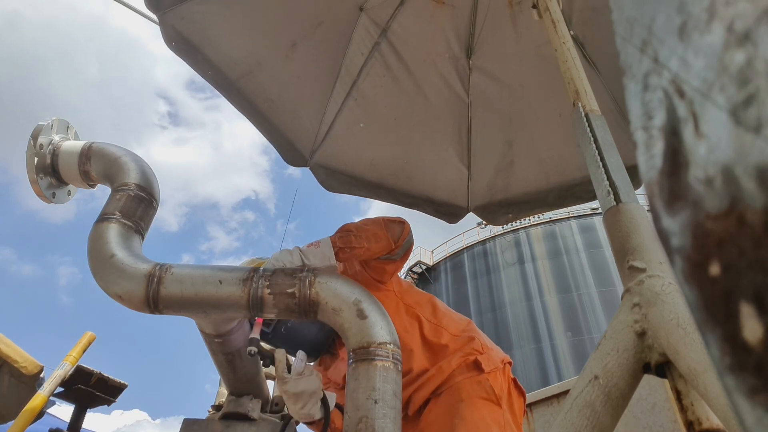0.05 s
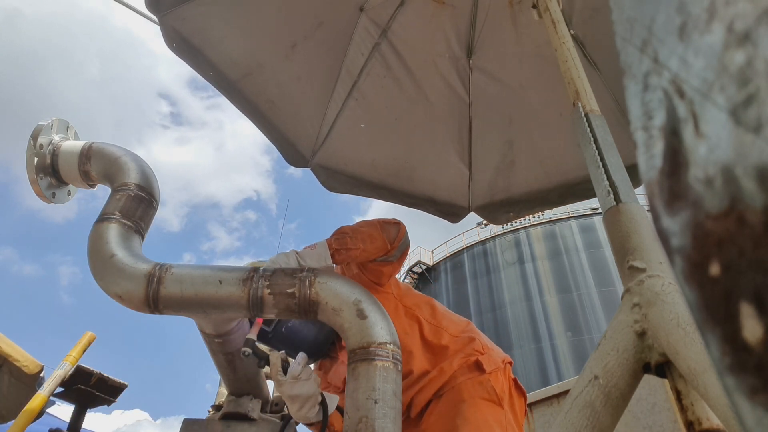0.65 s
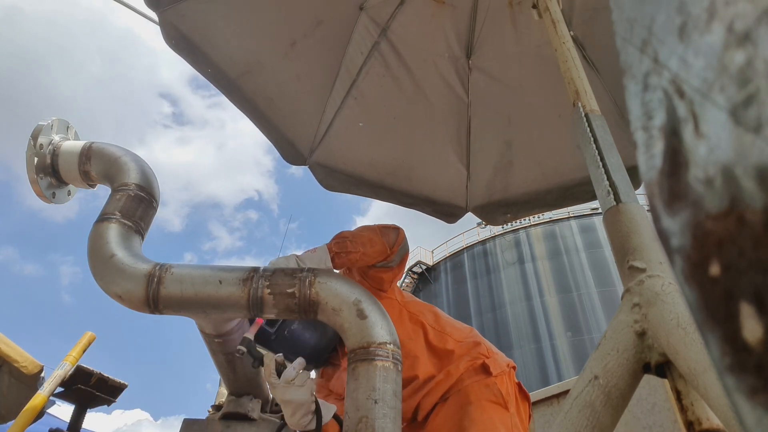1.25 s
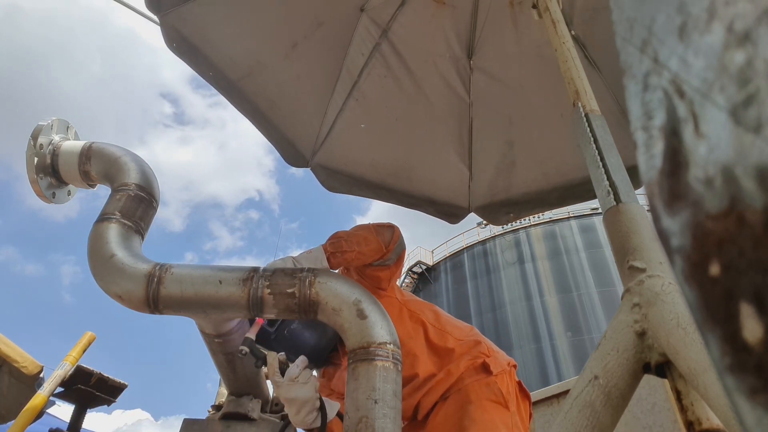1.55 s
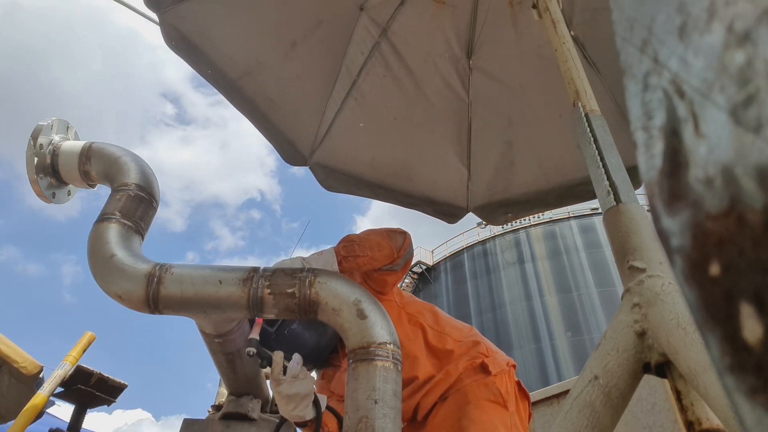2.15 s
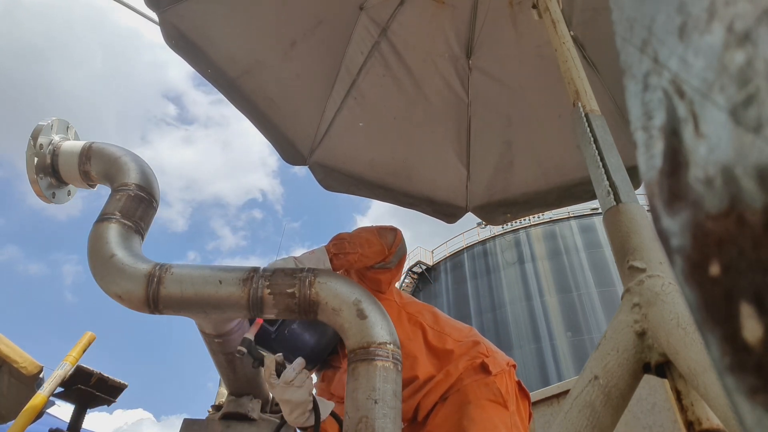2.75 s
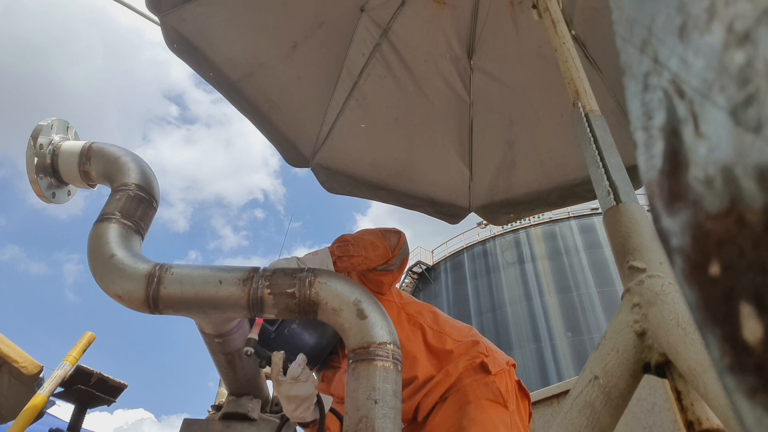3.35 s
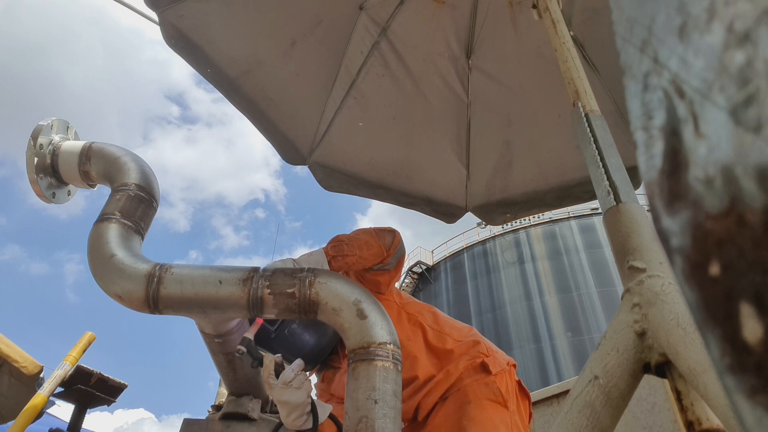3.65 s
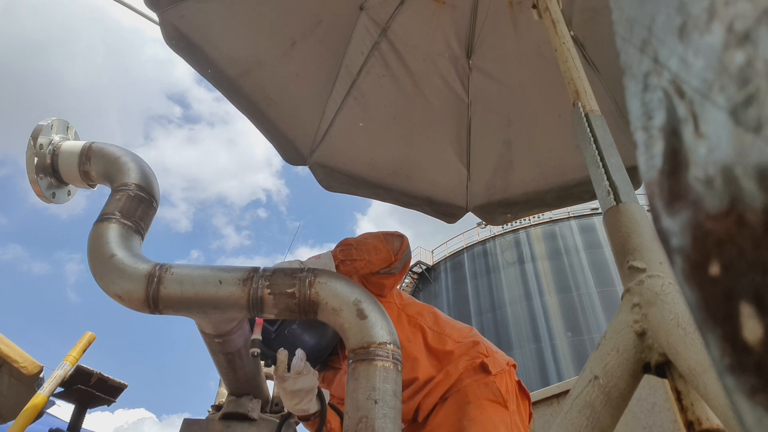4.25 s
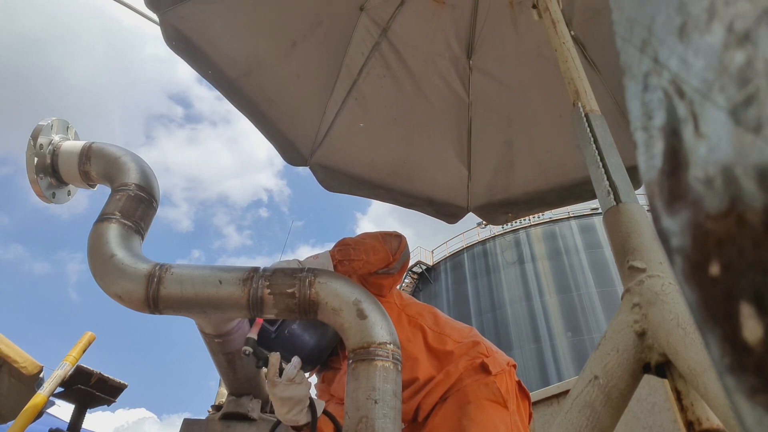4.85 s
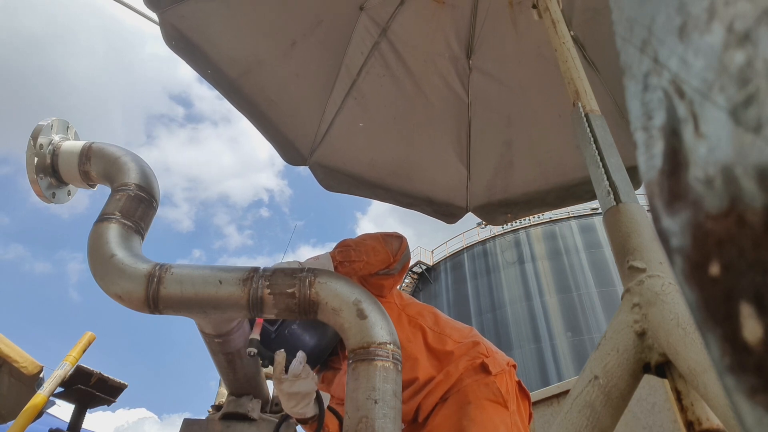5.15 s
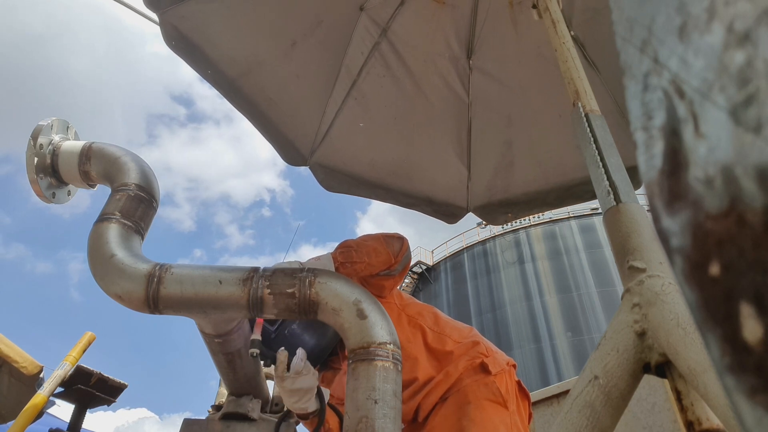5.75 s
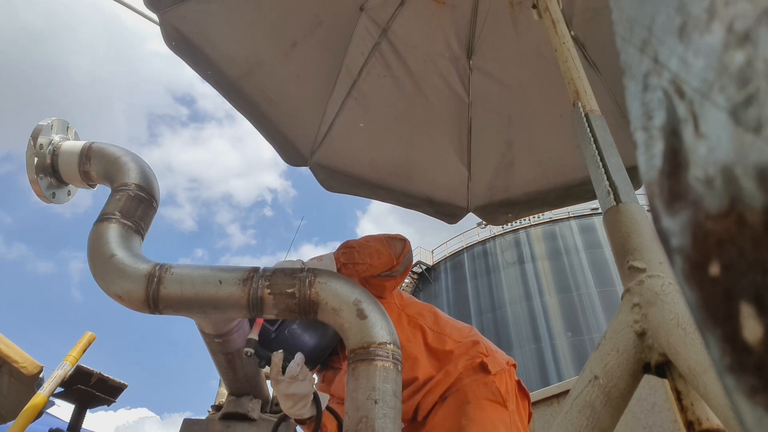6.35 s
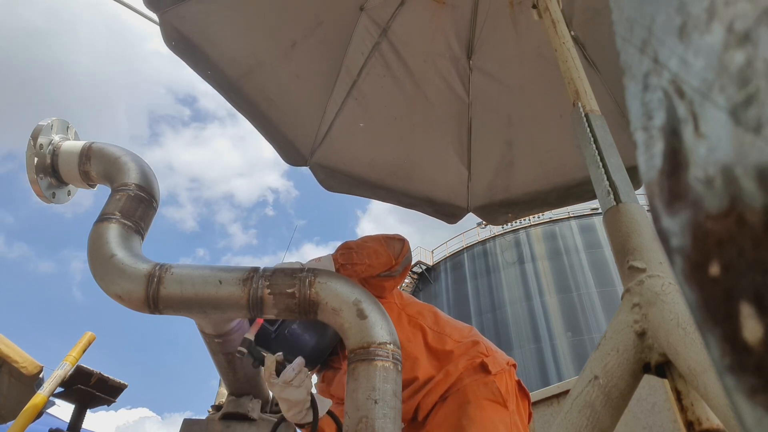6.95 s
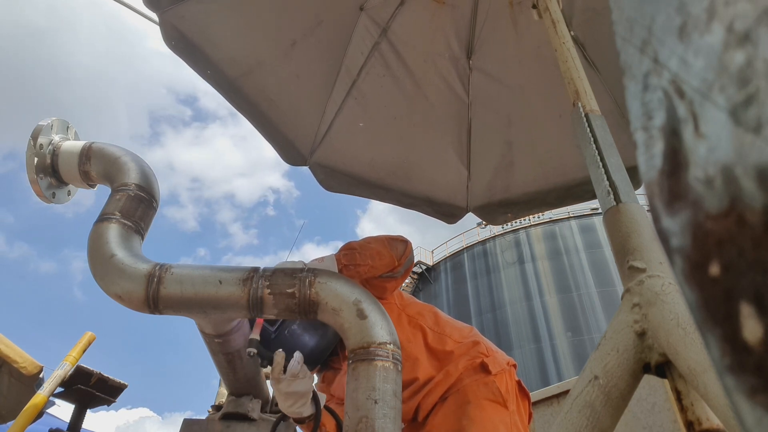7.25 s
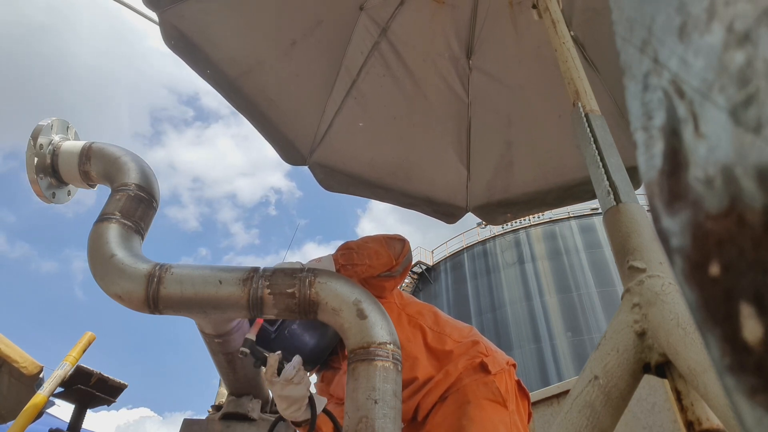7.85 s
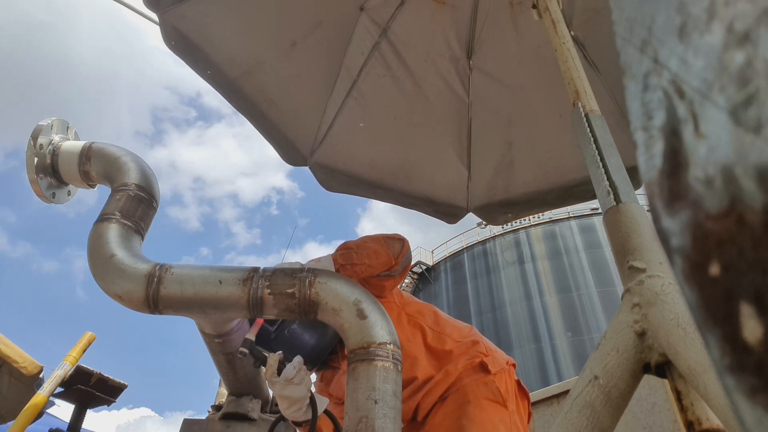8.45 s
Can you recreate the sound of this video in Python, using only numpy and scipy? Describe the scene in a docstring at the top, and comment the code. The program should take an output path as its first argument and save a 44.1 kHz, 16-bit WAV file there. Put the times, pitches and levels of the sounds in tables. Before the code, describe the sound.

An engine-driven welding generator hums steadily with a pulsing whine, while a welding arc hisses faintly on a steel pipe.

```python
"""An engine-driven welding generator hums outdoors while a pipe joint is TIG welded beside it.
The engine's firing makes the hum, which surges slightly two or three times a second. Its shaft
turns a droning fan and an alternator whose whine swells with each surge. Near 2 s the hum changes
tone and a faint rushing noise stops. The arc and its shielding gas hiss among the steel pipes,
whistling briefly at the start, and the arc spits once. A faint, even flutter lies over the hiss."""
import sys
import numpy as np
from scipy import signal
from scipy.fft import rfft, irfft, next_fast_len
from scipy.io import wavfile

SR = 44100
rng = np.random.default_rng(int(sys.argv[2]) if len(sys.argv) > 2 else 0)


def unload_wav(signal):
    """Save mono or channel-first audio to the path in sys.argv[1] as 16-bit WAV at rate SR, clipped to [-1, 1]."""
    wavfile.write(
        sys.argv[1],
        SR,
        np.round(np.clip(np.atleast_2d(signal).T, -1, 1) * 32767).astype(np.int16),
    )


N = 374409
TIME = np.arange(N) / SR
FFT_SIZE = next_fast_len(N, True)
FREQUENCIES = np.fft.rfftfreq(FFT_SIZE, 1 / SR)

# steady tones of the engine (multiple of the firing rate, level [dB])
STEADY_TONES = [(1, -25), (2, -39.5), (4, -55.5), (6, -68.5), (8, -74), (16, -73)]
# engine tones that change once (multiple of the firing rate, level before [dB], level after [dB],
# boost during the change [dB], growth afterwards [dB/s])
CHANGING_TONES = [(3, -50, -46, 9.5, .65), (5, -52.5, -62.5, 10, 0.5)]
# exhaust rumble (frequency [Hz], level [dB per Hz])
EXHAUST_RUMBLE = [(10, -78), (25, -65.5), (55, -62), (80, -60), (130, -64), (165, -66), (230, -65.5),
                  (300, -65), (355, -60.5), (410, -67), (490, -74.5), (600, -88), (780, -92), (2500, -120)]
# engine surges (start [s], length [s], full rise of the firing rate [Hz], full rise of the whine [dB])
ENGINE_SURGES = [(-0.04, 0.46, 0.83, 6.5), (0.67, 0.14, 2.03, 5.5), (0.96, 0.375, 0.3, 4.5),
                 (1.429, 0.21, 0.98, 2.2), (1.81, 0.34, 0.67, 7.5), (2.22, 0.25, 0.68, 5.2),
                 (2.551, 0.25, 1.1, 7), (2.941, 0.32, 0.79, 7), (3.35, 0.29, 0.8, 6.5),
                 (3.81, 0.27, 0.78, 8), (4.12, 0.13, 2.0, 7.5), (4.379, 0.23, 0.98, 5),
                 (4.809, 0.23, 0.8, 7.5), (5.14, 0.27, 0.3, 5.5), (5.5, 0.284, 1.096, 7.4),
                 (5.91, 0.25, 1.2, 8), (6.3, 0.34, 0.4, 6.5), (6.72, 0.23, 1.52, 7.2),
                 (7.179, 0.25, 1.0, 7), (7.54, 0.17, 0.2, 5.8), (7.9, 0.13, 0.5, 7),
                 (8.14, 0.29, 0.41, 4.5)]
# twisting shudder of the shaft (frequency [Hz], size [dB per Hz, relative to one firing cycle])
SHAFT_SHUDDER = [(3, -72), (8, -51), (12, -53), (20, -57), (40, -64), (60, -67), (88, -70.5), (102, -85),
                 (125, -90), (200, -100), (500, -140)]
# the tone an octave above the whine, between surges (time [s], level [dB])
WHINE_OCTAVE = [(0, -53), (.55, -56), (1.4, -53), (2.6, -51.5), (5.6, -53), (7, -56), (8.49, -64)]
# even hiss of the gas and the surroundings (frequency [Hz], level [dB per Hz])
GAS_HISS = [(100, -77), (620, -85), (780, -88.5), (1250, -87), (1650, -87), (2330, -97), (2650, -84),
            (4300, -86), (5100, -93), (7000, -92.5), (10500, -93), (12500, -96), (15500, -95)]
# pitches at which housing and pipes ring (frequency [Hz], width before narrowing [Hz],
# level [dB per Hz], left louder by [dB], left ahead by [radians])
STEEL_RESONANCES = [(954, 97, -73.8, -3, 1), (1138, 93, -83, 0, 0), (1410, 150, -77, -2.5, 2),
                    (1892, 156, -79, -6.5, 0.67), (2000, 115, -83, 4, 1.1), (2850, 445, -82.5, -6, -1.55),
                    (3338, 223, -73.5, -0.5, -1.1), (3805, 210, -78, 7, -2.13),
                    (4384, 136, -80.5, -6, -1.55), (5600, 200, -89.5, 1, 4.5), (6340, 270, -94, -6, -5),
                    (7130, 47, -82, -2, 1.5), (7790, 190, -89.5, 15, -2.5), (8170, 280, -86.5, 12, 1),
                    (8820, 200, -93.5, 6, .3), (9380, 100, -88, 13.5, 2.5), (9500, 130, -90, 12.5, 2.5),
                    (10000, 160, -92, 3, 1), (10250, 240, -87.5, 12, 2), (11130, 730, -92, 2, 1),
                    (12750, 400, -96, -8, 1), (13900, 800, -101, -12, -6)]
# swelling of the hiss in three bands (time [s], body [dB], sizzle [dB], fizz [dB])
HISS_SWELLS = [(0, 1, 2, -1), (.4, -.5, -1.5, -0.5), (1.2, 0.5, 0.5, -0.5), (1.55, 1, 2.3, 1.7),
               (2.35, 1.5, -1, .3), (2.75, -0.8, -1, -0.5), (3.15, .3, -1.5, 0.7), (4.2, 0.2, -1, 0.2),
               (5.45, 0, 0, 0), (5.7, 0, -0.5, .6), (6.5, 0.5, -.5, 0), (6.8, 1.1, 0, 1), (7.1, 0, 0, 0),
               (8.49, 0.2, 1, .5)]
# where each band is at full strength (body [Hz], sizzle [Hz], fizz [Hz])
BAND_CENTRES = [5200, 8500, 8700]
# spit of the arc (time [s], level at its loudest [dB], swell time [s])
ARC_SPITS = [(1.519, -29.7, 0.0046)]
# how the pipe rings after a spit (frequency [Hz], width [Hz], relative level [dB])
PIPE_RING = [(300, 110, 8), (980, 59, 7), (1970, 170, -6), (3420, 1100, -11), (6000, 2000, -29)]
# brief whistles in the gas hiss (time [s], spread [s], frequency [Hz], width [Hz], level [dB])
GAS_WHISTLES = [(0.1, 0.2, 2820, 110, -53), (0.06, 0.1, 8420, 110, -58)]

FIRING_HZ = 91.56  # firings per second, between surges
CHANGE_S, CHANGE_SPREAD_S = 1.93, 0.049  # when and how quickly the hum changes tone


def engine(cycles):
    """The engine's firings blend into a hum over a broad exhaust rumble."""
    throb_db = 0.16 * waver(4.6)
    hum = sum(tone(multiple * cycles, db + throb_db, pan_db=-0.5, lead=0.14)
              for multiple, db in STEADY_TONES)
    done, during = hum_change()
    for multiple, before_db, after_db, boost_db, growth in CHANGING_TONES:
        later_db = after_db + growth * (TIME - CHANGE_S)
        db = (1 - done) * before_db + done * later_db + during * boost_db
        hum += tone(multiple * cycles, db, pan_db=1, lead=0.14)
    noise = white() * left_right(pan_db=-0.5, lead=0.14) + 0.1 * stereo_white()
    return hum + to_samples(noise * tone_curve(EXHAUST_RUMBLE))


def hum_change():
    """How far the hum's change of tone has got (0 to 1), and a bump while it happens."""
    progress = (TIME - CHANGE_S) / CHANGE_SPREAD_S
    return smooth_step(progress), np.exp(-0.5 * progress ** 2)


def surges(attack_s=0.043, release_s=0.075):
    """Each surge rises quickly, holds and sinks back, lifting the firing rate and the whine's level."""
    rise_hz = rise_db = 0
    for start, length, hz, db in ENGINE_SURGES:
        rising = smooth_step((TIME - start) / attack_s)
        falling = smooth_step((start + length - TIME) / release_s)
        rise_hz += hz * rising * falling
        rise_db += db * rising * falling
    return rise_hz, rise_db


def shaft(rise_hz):
    """Counts firing cycles as the shaft surges slowly and shudders fast."""
    firing_hz = FIRING_HZ + rise_hz + 0.3997 * waver(9)
    shudder = to_samples(white() * tone_curve(SHAFT_SHUDDER))
    cycles = np.cumsum(firing_hz) / SR + shudder
    return cycles + 0.0019 * np.sin(2 * np.pi * cycles)  # each firing gives a small push


def fan(cycles, multiple=4.052):
    """The belt-driven fan drones just above the engine's fourth tone, so the two beat together."""
    _, during = hum_change()
    db = -32 + 0.15 * TIME + 0.62 * waver(6.5)
    dip_db = -21 * during  # the drone dips briefly as the hum changes
    return tone(multiple * cycles, db + dip_db, pan_db=3, lead=0.13)


def alternator(cycles, rise_db, multiple=10):
    """A whine and its octave swell with each surge; the shaft's shudder roughens their pitch."""
    whine_db = -44 + rise_db + 0.8 * waver(7.1)
    whine = tone(multiple * cycles, whine_db, pan_db=-3, lead=0.32)
    octave_db = time_curve(WHINE_OCTAVE) + 0.44 * rise_db + 1.2 * waver(8)
    return whine + tone(2 * multiple * cycles, octave_db, pan_db=-3.5, lead=0.7)


def arc(groups=3):
    """Arc and gas make a flickering hiss among the ringing steel."""
    hiss = to_samples(stereo_white() * tone_curve(GAS_HISS))
    # neighbouring pitches go in different groups, so their levels drift apart
    hiss += sum(ringing_steel(STEEL_RESONANCES[group::groups]) for group in range(groups))
    flicker = gain_of(0.47 * waver(70))
    return torch_motion(hiss) * flicker


def ringing_steel(resonances, narrowing=0.69):
    """Gas noise rings housing and pipes at a group of pitches that drift in level together."""
    spectrum = sum(white() * resonance(hz, narrowing * width) * gain_of(db) * left_right(pan_db, lead)
                   for hz, width, db, pan_db, lead in resonances)
    return to_samples(spectrum) * gain_of(0.69 * waver(5))


def torch_motion(hiss):
    """Moving the torch swells three bands of the hiss, each by its own amount."""
    spectrum = rfft(hiss, FFT_SIZE)
    moved = 0
    for column, weights in enumerate(np.eye(len(BAND_CENTRES)), 1):
        band = np.interp(FREQUENCIES, BAND_CENTRES, weights)  # fades into the bands beside it
        swell_db = time_curve(HISS_SWELLS, column) + 0.45 * waver(3)
        moved += to_samples(spectrum * band) * gain_of(swell_db)
    return moved


def spit():
    """A soft, short sputter of the molten metal rings the pipe."""
    envelope = sum(gain_of(db) / (1 + ((TIME - time) / swell) ** 2) for time, db, swell in ARC_SPITS)
    ring = sum(gain_of(db) * resonance(hz, width) for hz, width, db in PIPE_RING)
    sputter = white() + 0.5 * stereo_white()
    return envelope * normalise(to_samples(sputter * ring))


def whistles():
    """Narrow bands of the gas hiss stand out for a moment."""
    sound = 0
    for time, spread, hz, width, db in GAS_WHISTLES:
        noise = normalise(to_samples(stereo_white() * resonance(hz, width)))
        envelope = np.exp(-0.5 * ((TIME - time) / spread) ** 2)
        sound += noise * gain_of(db) * envelope
    return sound


def rush():
    """A faint rushing noise from the machine flares as the hum changes, then stops."""
    done, during = hum_change()
    noise = normalise(to_samples(white() * resonance(hz=446, width_hz=40)))
    return noise * (1 - done) * gain_of(-51 + 10 * during)


def flutter(hiss, flutter_hz=172.27):
    """A faint, even flutter is laid over the hiss."""
    angle = 2 * np.pi * flutter_hz * TIME
    return hiss * (1 + 0.11 * np.cos(angle) + 0.03 * np.cos(2 * angle))


def tone(cycles, db, pan_db, lead):
    """A pure stereo tone that starts at a random point in its cycle."""
    angle = 2 * np.pi * (cycles + rng.random())
    sides = left_right(pan_db, lead)
    return np.sqrt(2) * gain_of(db) * np.real(sides * np.exp(1j * angle))


def left_right(pan_db, lead):
    """Two gains that make the left side louder by pan_db and ahead by lead radians."""
    side = np.array([[0.5], [-0.5]])
    return gain_of(side * pan_db) * np.exp(1j * side * lead)


def resonance(hz, width_hz):
    """A bell-shaped gain that falls to half at width_hz either side of its peak."""
    return 1 / (1 + ((FREQUENCIES - hz) / width_hz) ** 2)


def tone_curve(points):
    """Gain at every frequency, from (frequency [Hz], level [dB]) points."""
    hz, db = np.transpose(points)
    return gain_of(np.interp(np.log(FREQUENCIES + 1), np.log(hz + 1), db))


def time_curve(rows, column=1):
    """Joins one column of timed rows with straight lines."""
    columns = np.transpose(rows)
    return np.interp(TIME, columns[0], columns[column])


def waver(rate_hz):
    """Random wobble of typical size 1, up to about the given rate."""
    times = np.arange(0, TIME[-1] + 1, 0.5 / rate_hz)
    return normalise(np.interp(TIME, times, rng.standard_normal(len(times))))


def white():
    """Spectrum of fresh white noise at 0 dB per Hz."""
    spectrum = rng.standard_normal(len(FREQUENCIES)) + 1j * rng.standard_normal(len(FREQUENCIES))
    return spectrum * np.sqrt(FFT_SIZE * SR) / 2


def stereo_white():
    """Separate white noise spectra for left and right."""
    return np.array([white(), white()])


def to_samples(spectrum):
    """Turns a spectrum into a sound wave."""
    return irfft(spectrum, FFT_SIZE)[..., :N]


def smooth_step(x):
    """Glides from 0 to 1 as x passes zero."""
    return 0.5 + 0.5 * np.tanh(x)


def gain_of(db):
    """Turns decibels into a multiplier."""
    return 10 ** (np.asarray(db) / 20)


def normalise(x):
    """Scales a signal to a typical size (rms) of 1."""
    return x / np.sqrt(np.mean(abs(x) ** 2) + 1e-30)


def scene():
    """One shaft drives engine, fan and alternator; the arc's hiss swells slightly with each surge."""
    rise_hz, rise_db = surges()
    cycles = shaft(rise_hz)
    hiss = arc() * gain_of(0.026 * (rise_db - rise_db.mean()))
    generator = engine(cycles) + fan(cycles) + alternator(cycles, rise_db)
    return generator + flutter(hiss) + spit() + whistles() + rush()


def record(dry):
    """Cuts away the very highest treble."""
    cutoff_hz = 15480
    lowpass = signal.firwin(1023, cutoff_hz, window=("kaiser", 9), fs=SR)
    return signal.oaconvolve(dry, lowpass[None], "same", axes=1)


dry = scene()
out = record(dry)
unload_wav(out)
```